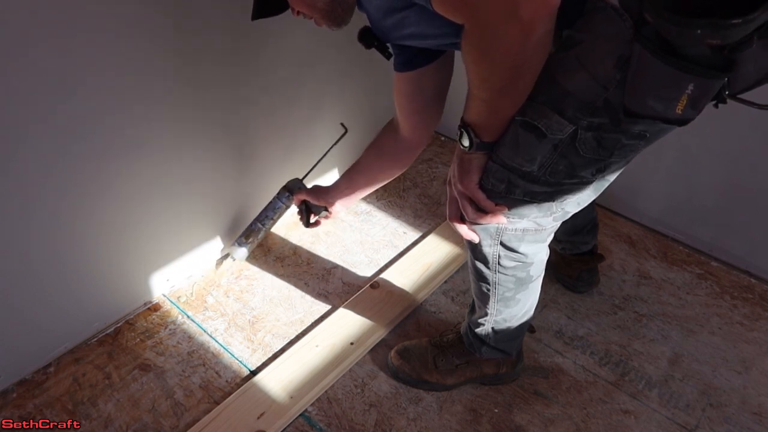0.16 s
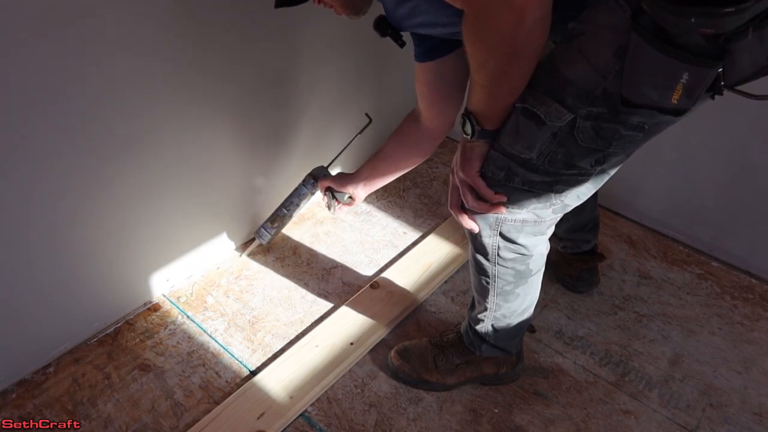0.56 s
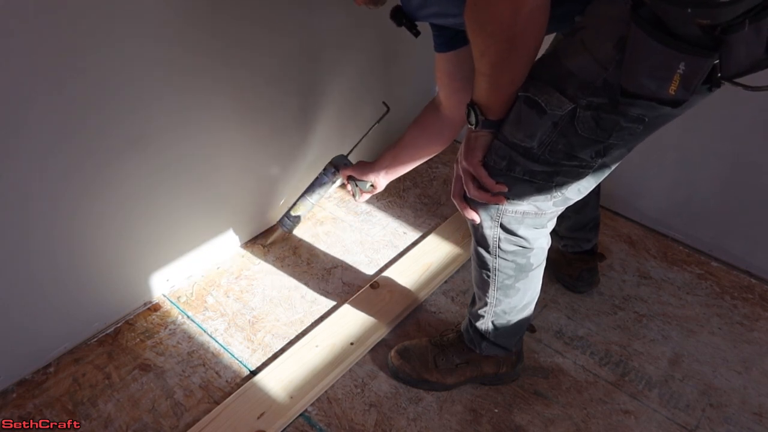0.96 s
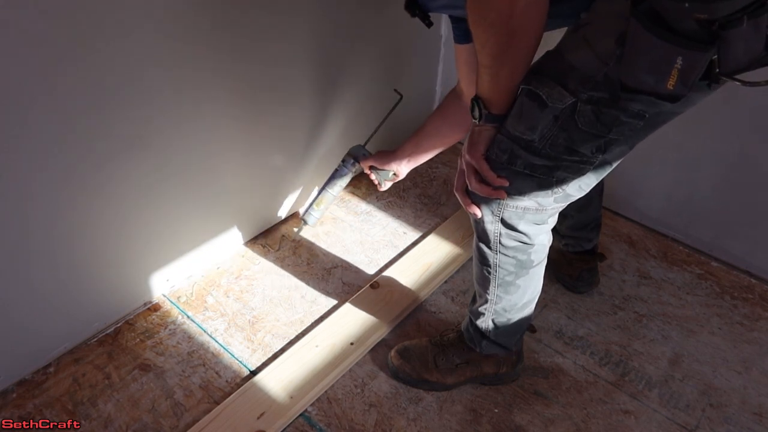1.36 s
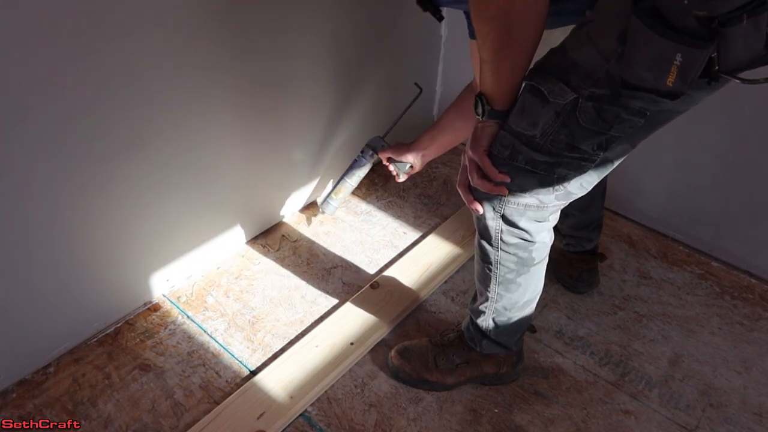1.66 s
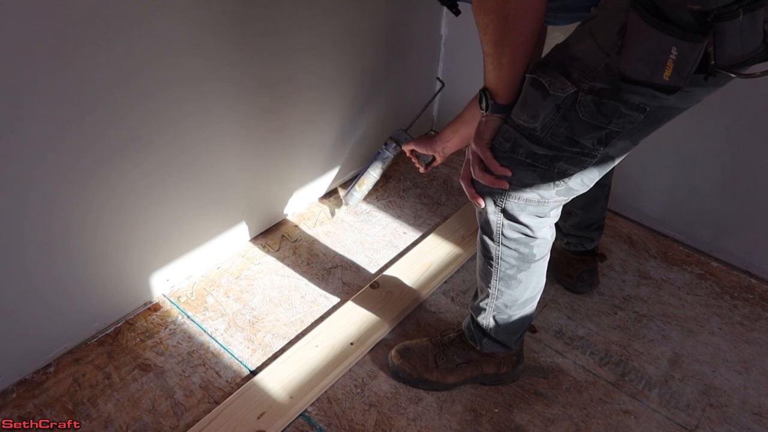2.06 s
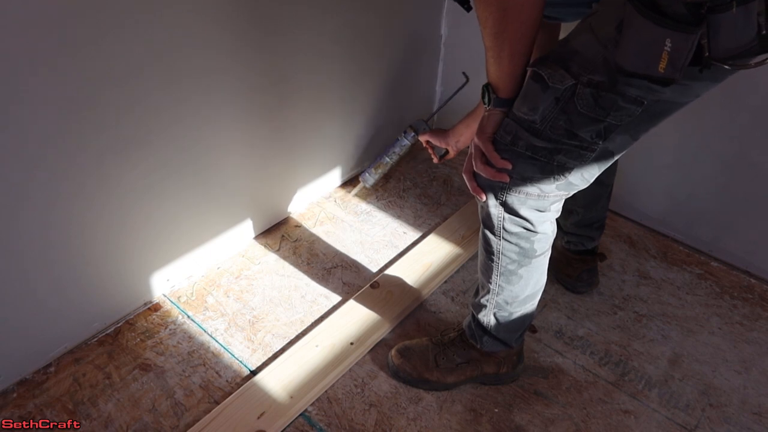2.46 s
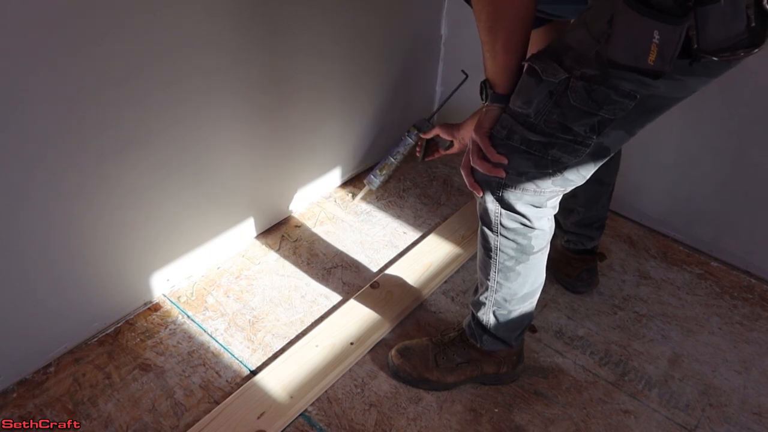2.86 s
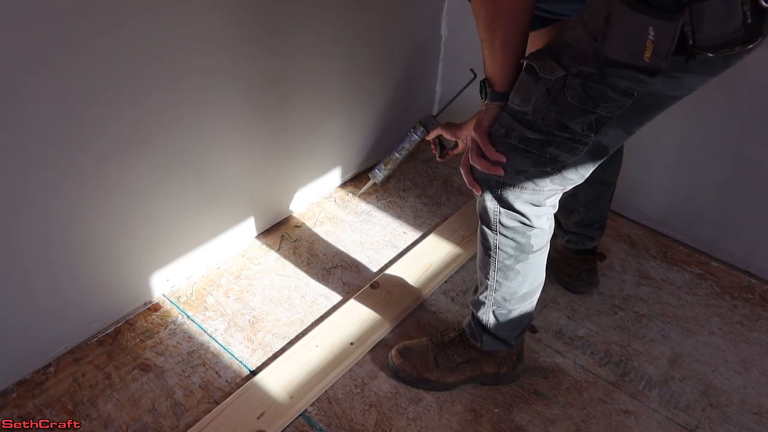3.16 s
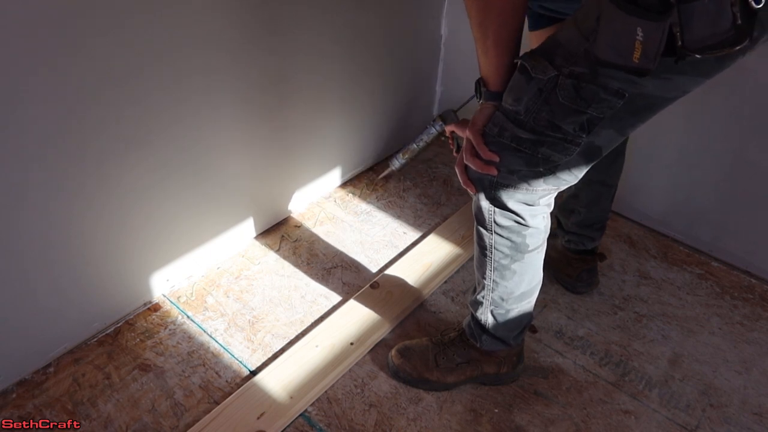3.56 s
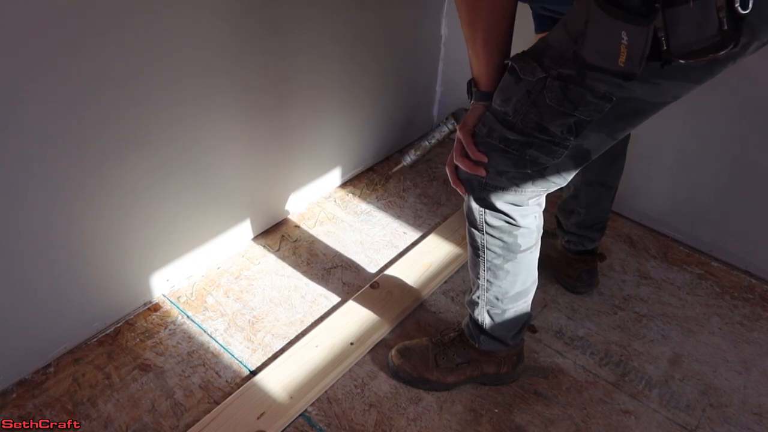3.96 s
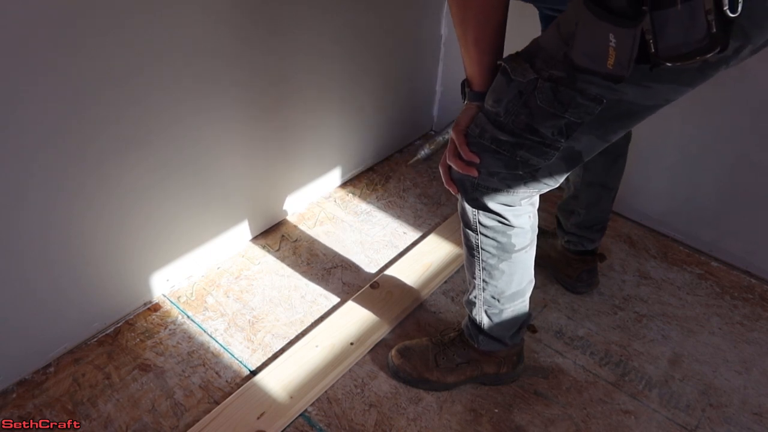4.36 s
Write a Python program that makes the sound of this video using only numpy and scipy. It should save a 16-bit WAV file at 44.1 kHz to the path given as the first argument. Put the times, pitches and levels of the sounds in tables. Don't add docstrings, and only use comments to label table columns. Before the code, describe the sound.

In a bare room with hard walls, boards bump and scuff softly in an uneven, steady beat on a hollow wooden floor. A caulking gun clicks at its release tab, then its trigger snaps loudly with a short steel ring. More wood knocks follow, then a loose plate clatters and bites, and another double trigger snap rings out. Knocks continue to the end. Near microphone, short bright room tail, faint low room noise.

```python
import sys
import numpy as np
from scipy import signal
from scipy.fft import rfft, irfft, next_fast_len
from scipy.io import wavfile
from scipy.ndimage import uniform_filter1d

SR = 44100
rng = np.random.default_rng(int(sys.argv[2]) if len(sys.argv) > 2 else 0)


def gain_from_decibels(decibels):
    exponent = np.asarray(decibels, float) / 20
    return 10 ** exponent


def unload_wav(signal):
    wavfile.write(
        sys.argv[1],
        SR,
        np.round(np.clip(np.atleast_2d(signal).T, -1, 1) * 32767).astype(np.int16),
    )


N = 199331

# start in seconds, swell in seconds, strength in dB, hardness in dB.
SHOVED = [(0.0, 0.072, -51, -4), (0.131, 0.15, -45.5, -3), (0.186, 0.006, -50, 0), (0.445, 0.055, -57, 9.5),
          (0.523, 0.11, -44.5, 3), (0.703, 0.083, -56, 0), (0.889, 0.093, -41.5, 0.5),
          (1.127, 0.0065, -61.5, -2), (1.198, 0.1, -45.5, -2.5), (1.41, 0.038, -48, -9),
          (1.53, 0.043, -57.5, 4.5), (1.56, 0.0035, -44, -4.5), (1.591, 0.012, -38.5, -1.5),
          (1.887, 0.0057, -45.5, -2), (1.89, 0.031, -42, -4), (2.039, 0.02, -49.5, -6),
          (2.2, 0.0063, -43.5, -2), (2.205, 0.059, -45.5, 1.5), (2.356, 0.038, -44, -3),
          (2.501, 0.0061, -45, -2.5), (2.51, 0.041, -47, 2), (2.75, 0.025, -50.5, 7),
          (3.004, 0.036, -63.5, 9), (3.216, 0.12, -56, 3.5), (3.35, 0.16, -47.5, -6),
          (3.57, 0.071, -42.5, -1), (3.718, 0.013, -44, -12), (3.86, 0.0074, -45, 3.5),
          (3.87, 0.045, -41, 0.5), (4.02, 0.022, -51, -8.5), (4.14, 0.021, -50.5, -2),
          (4.167, 0.0086, -43, -0.5), (4.175, 0.052, -40.5, -3.5), (4.3, 0.033, -55.5, 2),
          (4.372, 0.009, -61.5, 4), (4.44, 0.084, -45, -2.5)]


def unit(x):
    return x / np.sqrt(np.mean(x ** 2) + 1e-20)


def along(points, hz):
    f, v = np.transpose(points)
    return np.interp(np.log(hz + 1), np.log(f + 1), v)


def filtered(x, response):
    m = next_fast_len(len(x) + 8192)
    return irfft(rfft(x, m) * response(np.fft.rfftfreq(m, 1 / SR)), m)[:len(x)]


def shaped(x, spectrum):
    return filtered(x, lambda f: gain_from_decibels(along(spectrum, f)))


def body(peaks):
    def response(f):
        total = 0
        for k, (centre, width, db) in enumerate(peaks):
            damping = 1j * f * width
            total = total + (-1) ** k * gain_from_decibels(db) * damping / (centre * centre - f * f + damping)
        return total
    return response


def causal(gain):
    def response(f):
        cepstrum = irfft(np.log(np.abs(gain(f)) + 1e-6))
        cepstrum[1:len(f) - 1] *= 2
        cepstrum[len(f):] = 0
        return np.exp(rfft(cepstrum))
    return response


def ring(modes, blur):
    t = np.arange(SR // 3) / SR
    out = np.zeros(len(t))
    for hz, db, t60 in modes:
        level = gain_from_decibels(db + rng.normal(0, 1) - 60 * t / t60)
        drift = blur * np.cumsum(rng.standard_normal(len(t)))
        out += level * np.sin(2 * np.pi * hz * t + drift) * (1 - np.exp(-t / 0.013))
    return out


def room(x, delay_s, build_s):
    # frequency in Hz, t60 in seconds.
    wall_t60 = [(500, 0.7), (1300, 0.33), (3500, 0.43), (6000, 0.41), (9000, 0.28), (14000, 0.32)]
    # frequency in Hz, level in dB.
    wall_colour = [(500, 10), (2000, 4.5), (3200, 4), (4100, -2), (5000, 0.5), (9000, 1.5), (15000, -10)]
    hz, t, z = signal.stft(rng.standard_normal(SR // 3), SR, nperseg=256)
    decay_db = 60 * t / along(wall_t60, hz)[:, None]
    tail = signal.istft(z * gain_from_decibels(along(wall_colour, hz)[:, None] - decay_db), SR, nperseg=256)[1]
    tail = tail * (1 - np.exp(-np.arange(len(tail)) / SR / build_s))
    return np.pad(signal.fftconvolve(x, tail / np.linalg.norm(tail)), (round(delay_s * SR), 0))


def spread(x, response):
    puff = filtered(np.arange(2048) == 0, causal(response))
    return puff * np.linalg.norm(x) / np.linalg.norm(puff)


def add(track, s, x):
    part = track[round(s * SR):][:len(x)]
    part += x[:len(part)]


def rattle(ms, response, crack=0):
    t = np.arange(2048) / SR
    u = t / (ms / 1000)
    chatter = rng.standard_normal(2048) * (1 - np.exp(-u / 0.016))
    settling = 0.083 * np.exp(-t / 0.013)
    top = lambda f: (1j * f / (9000 + 1j * f)) ** 2
    x = filtered(chatter * (np.exp(-u ** 2.5) + settling), lambda f: response(f) * (1 - top(f)))
    x += filtered(chatter * (np.exp(-u * 1.9) + settling), lambda f: response(f) * top(f))
    x = x / np.abs(x).max()
    x += crack * np.diff(chatter, prepend=0) * np.exp(-t / 0.00021)
    return x / np.abs(x).max()


def jolts(per_s, spread_db, smooth):
    sizes = gain_from_decibels(spread_db * np.minimum(rng.exponential(size=N), 2)) * rng.standard_normal(N)
    return unit(sizes * (rng.random(N) < per_s / SR)) + smooth * rng.standard_normal(N)


def steady(x, share):
    power = np.abs(uniform_filter1d(x ** 2, 2500)) + 1e-12
    return unit(x / power ** (share / 2))


def swells(rows, levels_db, fade, hold=0):
    start, swell = np.transpose(rows)[:2, :, None]
    t = np.arange(0, N + 64, 64) / SR - start
    rise = np.clip(t / np.maximum(swell, .004), 0, 1)
    fading_s = np.maximum(t - swell * (1 + hold), 0)
    power = (rise * gain_from_decibels(levels_db[:, None] - fade * fading_s)) ** 2
    return np.interp(np.arange(N) / 64, np.arange(t.shape[1]), np.sqrt(power.sum(0)))


def still_air():
    # frequency in Hz, density in dB per Hz.
    air_spectrum = [(15, -60.5), (30, -27), (60, -11), (200, -4.5), (460, -1), (1100, -13.5), (2200, -15.5),
                    (4000, -16.5), (7000, -22.5), (9500, -30.5), (12700, -35.5), (13000, -56)]
    return gain_from_decibels(-65.5) * unit(shaped(rng.standard_normal(N), air_spectrum))


def shuffles():
    # start in seconds, swell in seconds, cavity level in dB,
    # then sheets and joists in dB against the cavity.
    landings = [(0, 0.083, -48, -1, -11.5), (0.13, 0.14, -46, -3.5, -18), (0.346, 0.1, -51, 5, -5.5),
                (0.53, 0.11, -36.5, -8.5, -18.5), (0.76, 0.016, -48, 1.5, -7),
                (0.876, 0.12, -36.5, -10, -15.5), (1.097, 0.037, -49, -3.5, -7.5),
                (1.201, 0.1, -42, -6.5, -18.5), (1.402, 0.065, -45.5, 2.5, -8),
                (1.562, 0.008, -50.5, -1, -16), (1.575, 0.059, -44, -3, -11),
                (1.885, 0.0067, -47.5, -7, -15), (1.89, 0.04, -41, -10.5, -14), (1.991, 0.1, -54, 0, -29),
                (2.198, 0.02, -53.5, 2.5, -19), (2.209, 0.063, -51, -2, -28.5),
                (2.341, 0.077, -47.5, 1, -33), (2.474, 0.11, -53.5, 4.5, -31.5),
                (2.639, 0.1, -56.5, 4.5, -4), (2.965, 0.095, -68, -5.5, -18.5), (3.207, 0.12, -56, -2, -15),
                (3.351, 0.041, -50.5, 2, -1), (3.443, 0.0096, -56, 7, 0), (3.567, 0.077, -43, -3, -6),
                (3.862, 0.012, -42, -4.5, -6), (3.87, 0.075, -42, -3, -4), (4.167, 0.0067, -41, -6.5, -3),
                (4.177, 0.047, -38, -7.5, -0.5), (4.33, 0.058, -52, -2.5, -12),
                (4.464, 0.0074, -42, -5.5, -7), (4.47, 0.056, -46.5, -8, -9)]
    # frequency in Hz, width in Hz, level in dB.
    cavity = [(459.2, 12, 6), (488, 20, -5), (531.1, 17, 3)]
    # frequency in Hz, width in Hz, level in dB.
    sheets = [(255, 18, -4), (305, 14, 5.5), (371, 44, 5), (426, 26, 3)]
    # frequency in Hz, width in Hz, level in dB.
    joists = [(120, 32, 4), (155, 32, 8), (239, 2.6, -9)]
    # frequency in Hz, width in Hz, level in dB.
    planks = [(562.8, 9.1, 5.5), (600, 7, 4.5), (646.6, 53, -8), (752.6, 32, -5.5), (776.4, 22, -3),
              (939.6, 45, -6)]
    # frequency in Hz, width in Hz, level in dB.
    first_edges = [(1002, 67, -1.5), (1267, 74, -10), (1298, 120, -3.5), (1871, 50, 1.5), (1925, 90, 2.5),
                   (2240, 120, -4.5)]
    # frequency in Hz, width in Hz, level in dB.
    later_edges = [(926, 93, -12), (1220, 70, 8), (1286, 160, 0), (2087, 90, 3), (2330, 120, 5.5),
                   (3180, 190, -3.5)]
    # time in seconds, share of the later boards from 0 to 1.
    later_share = [(0, 0.08), (1.3, 0.39), (1.6, 0.26), (2.0, 0.63), (2.6, 0.33), (3.5, 0.66), (4.5, 0.92)]
    strength_db, hard_db = np.transpose(SHOVED)[2:]
    cavity_db, sheets_db, joists_db = np.transpose(landings)[2:]
    bumps = jolts(600, spread_db=4.5, smooth=1.6)

    def rung(peaks, leak):
        low, high = peaks[0][0], peaks[-1][0]
        span = body([(np.sqrt(low * high), 1.71 * (high - low), 0)])
        return steady(filtered(bumps, lambda f: (body(peaks)(f) + leak) * span(f) ** 2), share=0.12)

    def landed(levels_db, fade):
        return swells(landings, levels_db, fade, hold=0.068)

    later = np.interp(np.arange(N) / SR, *np.transpose(later_share))
    edges = np.sqrt(1 - later) * rung(first_edges, leak=0.062)
    edges += np.sqrt(later) * rung(later_edges, leak=0.033)
    out = landed(cavity_db + 1, fade=160) * rung(cavity, leak=0.01)
    out += landed(cavity_db + sheets_db - 3.5, fade=110) * rung(sheets, leak=0.42)
    out += landed(cavity_db + joists_db - 6.5, fade=100) * rung(joists, leak=0.22)
    out += swells(SHOVED, strength_db - 2.5, fade=125) * rung(planks, leak=0.3)
    out += swells(SHOVED, strength_db + hard_db - 4.5, fade=136.5) * edges
    return out


def blows():
    # start in seconds, peak in dB, ring
    # frequency in Hz.
    knocks = [(0.058, -45, 470), (0.4605, -21.5, 640), (0.602, -52, 467), (0.77, -61, 472),
              (1.224, -60, 480), (1.455, -31.5, 392), (1.311, -35, 519), (1.564, -31, 684), (1.6, -38, 599),
              (1.612, -27, 654), (3.67, -28, 560), (1.827, -42.5, 600), (1.894, -33, 447),
              (1.908, -39, 633), (1.937, -34.5, 678), (2.07, -45.5, 638), (2.203, -39, 778),
              (2.221, -27, 635), (2.256, -33.5, 633), (2.368, -46.5, 650), (2.39, -38, 683),
              (2.512, -36, 600), (2.529, -28, 659), (2.549, -40, 674), (2.757, -32.5, 618),
              (3.23, -47, 540), (0.921, -35, 800), (2.852, -39, 700), (3.39, -37, 600), (3.449, -31, 594),
              (3.487, -25.5, 600), (3.073, -46, 300), (3.095, -44, 620), (3.606, -42, 840),
              (3.907, -27, 800), (4.211, -34, 657), (3.738, -26, 556), (3.871, -32.5, 545),
              (4.172, -32, 700), (4.395, -39, 458), (4.468, -38, 504)]
    out = np.zeros(N)
    for s, db, hz in knocks:
        add(out, s, gain_from_decibels(db - 7.0) * rattle(6.2, body([(hz, 140, 0), (1.68 * hz, 500, -9)])))
    return out


def boards():
    return filtered(shuffles() + blows(), lambda f: (1j * f / (60 + 1j * f)) ** 3 / (1 + 1j * f / 5500) ** 3)


def grit():
    # frequency in Hz, density in dB per Hz.
    coarse = [(1800, -120), (2500, 4), (4000, 2.5), (6000, -13), (7500, -120)]
    # frequency in Hz, density in dB per Hz.
    fine = [(5000, -120), (6200, 8.5), (9000, -2.5), (12500, -14), (13200, -32.5), (16000, -39)]
    strength_db, hard_db = np.transpose(SHOVED)[2:]
    grains = jolts(1100, spread_db=11.0, smooth=1.1)
    out = swells(SHOVED, strength_db + 1.1 * hard_db - 13, fade=240) * unit(shaped(grains, coarse))
    out += swells(SHOVED, strength_db + 0.64 * hard_db - 27.5, fade=270) * unit(shaped(grains, fine))
    return out


def sing(rows, blur):
    out = np.zeros(N)
    for s, db, hz, t60 in rows:
        add(out, s, ring([(hz, db, t60)], blur))
    return out


def plank_notes():
    # start in seconds, level in dB, frequency in Hz, t60 in seconds.
    plank_tones = [(0.96, -46, 752, 0.3), (0.97, -49.5, 1410, 0.51), (1.6, -41, 1220, 0.43),
                   (1.6, -46, 915, 0.25), (1.605, -55, 1930, 0.27), (2.22, -48, 1087, 0.47),
                   (3.075, -59, 1350, 0.26), (3.11, -48, 460, 0.14), (3.325, -44, 1990, 0.15),
                   (3.327, -42, 900, 0.089), (3.585, -44, 2070, 0.15), (3.636, -45.5, 2310, 0.14),
                   (3.64, -52, 378, 0.95), (3.9, -42.5, 791, 0.22), (3.9, -45.5, 378, 0.71),
                   (3.9, -40, 1206, 0.42), (4.18, -36.5, 378, 0.52), (4.18, -36.5, 789, 0.3),
                   (4.18, -51.5, 1200, 0.4), (4.19, -56, 2300, 0.24), (4.2, -56, 155, 0.6),
                   (4.47, -49.5, 378, 0.41), (4.487, -45, 1190, 0.37), (1.39, -48.5, 193.8, 0.25),
                   (1.44, -46.5, 302, 0.18), (1.465, -44.5, 438.8, 0.18), (3.07, -54.5, 255, 0.19),
                   (3.42, -47.5, 254.7, 0.43), (3.75, -47, 255, 0.32)]
    return sing(plank_tones, blur=0.1)


def contacts(rows, ms, gain_db, peaks_at):
    out = np.zeros(N)
    for s, db, hz in rows:
        colour = body(peaks_at(hz))
        tick = rattle(ms, lambda f: colour(f) / (1 + (f / 14000) ** 4))
        received = spread(tick, lambda f: colour(f) / (1 + (f / 10000) ** 4))
        add(out, s, gain_from_decibels(db + gain_db + 3.5) * tick)
        add(out, s, gain_from_decibels(db + gain_db - 5.5) * room(received, delay_s=0.0021, build_s=.008))
    return out


def scuffs():
    # start in seconds, peak in dB, strongest frequency in Hz.
    caught = [(1.5648, -45, 1910), (1.9114, -43, 2330), (2.2244, -40, 2190), (2.2568, -39.5, 2040),
              (2.369, -42.5, 2050), (2.4014, -48, 2160), (2.5257, -42, 1910), (2.5544, -40, 2030),
              (2.5744, -41, 2070), (3.6194, -48, 2210), (3.6394, -43, 2330), (3.7404, -35, 2410),
              (3.9294, -49, 2270), (3.9494, -48, 1950), (4.2294, -40, 2300), (4.2494, -50, 2030),
              (4.4792, -48, 2930)]
    return contacts(caught, 5, -12, lambda hz: [(2100, 700, -3), (hz, 900, 0), (6000, 4000, -17)])


def belt_ticks():
    # start in seconds, peak in dB, strongest frequency in Hz.
    jingles = [(0.121, -52.5, 4800), (0.325, -59, 4700), (0.355, -60, 4700), (2.258, -66, 6950),
               (2.721, -56, 4910), (3.871, -40, 5100), (4.134, -53.5, 7500), (4.2, -49, 8740),
               (4.213, -40.5, 6990), (4.3227, -59.5, 8580), (4.477, -67, 9000), (4.498, -68, 9000)]
    return contacts(jingles, 3.5, 0, lambda hz: [(3000, 2500, -8), (hz, 2500, 0.5), (12000, 4000, -13)])


def rod_ticks():
    # start in seconds, peak in dB, strongest frequency in Hz.
    touches = [(0.189, -68, 3640), (0.2462, -52, 4600), (0.259, -54, 3640), (0.6018, -59, 3900),
               (0.629, -53, 3640), (1.4262, -54, 4460), (1.544, -56.5, 3650), (1.5683, -62, 3700),
               (1.8895, -54, 3700), (1.9447, -51, 3980), (2.057, -60, 4000), (2.2086, -56.5, 4740),
               (2.262, -49.5, 3760), (2.3815, -54, 3780), (2.5098, -50.5, 3700), (2.5431, -50.5, 3840),
               (3.2053, -54.5, 2800), (3.324, -51, 3400), (3.5904, -49.5, 3600), (3.6657, -53, 3970),
               (3.7806, -60, 3700), (3.74, -61, 2670), (3.9068, -67, 3980), (4.025, -54.5, 3900),
               (4.189, -43, 2500), (4.1713, -47, 4770), (4.381, -56.5, 3360), (4.393, -57, 2600),
               (4.322, -51.5, 2460), (1.61, -61, 3650), (1.653, -62, 3440), (3.097, -57.5, 3000),
               (4.452, -61, 6240), (4.5103, -52.5, 3560)]
    return contacts(touches, 6, 0, lambda hz: [(2100, 900, -4), (hz, 1500, 0), (8500, 4000, -12)])


def drag():
    # start in seconds, swell in seconds, level in dB.
    slips = [
        (2.734, 0.033, -48),
        (2.805, 0.06, -52),
    ]
    # frequency in Hz, density in dB per Hz.
    scrape_spectrum = [(600, -120), (1200, -1.5), (2500, 3), (6000, 0), (11000, -18.5), (15500, -21),
                       (16200, -120)]
    scrape = shaped(jolts(900, spread_db=8.0, smooth=1.1), scrape_spectrum)
    return swells(slips, np.transpose(slips)[2], fade=250) * unit(scrape)


def cradle_notes():
    # start in seconds, level in dB, frequency in Hz, t60 in seconds.
    cradle_tones = [
        (0.872, -48.5, 3250, 0.3),
        (0.925, -36.5, 6086, 0.3),
        (0.925, -42, 4730, 0.5),
        (0.925, -42.5, 6930, 0.25),
        (2.856, -43.5, 5310, 0.45),
        (3.386, -36.5, 4720, 0.39),
        (3.386, -42, 5600, 0.35),
        (3.386, -44, 3100, 0.3),
        (3.386, -45.5, 2000, 0.3),
    ]
    return sing(cradle_tones, blur=0.2)


def gun_part(rows, ms, ring_db, wide_hz, room_db):
    # frequency in Hz, width in Hz, level in dB.
    frame = [(1771, 390, -9), (3850, 130, -22), (4600, 83, -14), (5750, 970, -7), (6800, 540, -7),
             (7450, 630, -5.5), (9800, 1200, -5.5), (10200, 1400, -6.5), (13300, 640, -14.5)]
    # frequency in Hz, level in dB, t60 in seconds.
    rod = [(4700, -30, 0.36), (5370, -35.5, 0.17), (6580, -23.5, 0.074), (3316, -39, 0.44)]
    # delay in seconds, level in dB.
    echoes = [(0.0182, -26.5), (0.031, -18), (.042, -20.5)]
    out = np.zeros(N)
    for s, db, hz, low_db, top_db in rows:
        tilt = [(120, low_db - 11.5), (700, low_db + 2.5), (1500, low_db + 7.5), (3500, 0.0063),
                (7500, top_db + 6.5), (11000, top_db + 6.5), (15600, top_db - 2), (16800, top_db - 18.5)]
        steel = min(1, gain_from_decibels(-low_db - 9.5))

        def colour(f, share=1):
            favoured = share * np.abs(body([(hz, wide_hz, -2)])(f))
            return gain_from_decibels(along(tilt, f)) * (steel * np.abs(body(frame)(f)) + 0.11 + favoured)

        snap = rattle(ms, causal(colour), crack=gain_from_decibels(2.2 * top_db + 2))
        received = spread(snap, lambda f: colour(f, share=0.38) ** 1.2)
        add(out, s, gain_from_decibels(db) * snap)
        add(out, s, gain_from_decibels(db + ring_db) * ring(rod, blur=0.22))
        add(out, s, gain_from_decibels(db + room_db) * room(received, delay_s=0.0048, build_s=0.011))
        for delay_s, echo_db in echoes:
            echo = filtered(snap, lambda f: 1 / (1 + 1j * f / 9000) ** 2)
            add(out, s + delay_s, gain_from_decibels(db + echo_db) * echo)
    return out


def release():
    # start in seconds, peak in dB, strongest frequency in Hz, low and top part in dB.
    releases = [
        (.4540, -49, 3000, -15, -34.5),
        (.4607, -18.5, 5350, -5.5, -22.5),
        (.4643, -32, 2380, -3, -29.5),
        (.4737, -28.5, 3477, -14, -33),
    ]
    # frequency in Hz, width in Hz, level in dB.
    tab_modes = [(8390, 910, -12), (9300, 700, -6.5)]
    out = gun_part(releases, ms=2.8, ring_db=-10, wide_hz=1600, room_db=-5)
    colour = lambda f: body(tab_modes)(f) ** 2
    tab = rattle(1.7, colour)
    add(out, .4607, gain_from_decibels(-30.5) * tab)
    add(out, .4607, gain_from_decibels(-32.0) * room(spread(tab, colour), delay_s=.002, build_s=0.009))
    return out


def plate():
    # start in seconds, peak in dB, strongest frequency in Hz, low and top part in dB.
    clatter = [(2.7540, -37.5, 2100, -9, -29.5), (2.7590, -34, 2380, -22, -23.5),
               (2.7733, -23, 2700, -13.5, -23), (2.7923, -20.5, 1540, -14, -17.5),
               (2.8005, -29, 2080, -17.5, -12.5), (2.8140, -31, 2590, 19, -5.5),
               (2.8065, -40, 3510, -13, -22.5), (2.8200, -45.5, 1600, -7, -22),
               (2.8390, -43, 3200, -7, -20), (2.8290, -38, 3000, -17, -17.5),
               (2.8325, -35.5, 5500, -26, -23.5), (2.8700, -36, 5630, -25, -21),
               (3.0210, -39.5, 3400, 1, -17.5), (3.0350, -42.5, 3700, -16, -28),
               (3.0545, -40, 3000, -11.5, -22.5)]
    return gun_part(clatter, ms=7, ring_db=-3, wide_hz=230, room_db=-9.5)


def bite():
    # start in seconds, peak in dB, strongest frequency in Hz, low and top part in dB.
    bites = [
        (2.8505, -8, 5910, -17, -8),
        (2.8575, -23.5, 3120, -12, -17.5),
    ]
    return gun_part(bites, ms=5.3, ring_db=-9.5, wide_hz=780, room_db=-10.5)


def trigger():
    # start in seconds, peak in dB, strongest frequency in Hz, low and top part in dB.
    clicks = [
        (.8688, -23, 6680, -19, -12.5),
        (.9200, -5.5, 3850, -23.5, -9.5),
        (3.3725, -16.5, 5640, -27.5, -10),
        (3.3818, -7.5, 4860, -22.5, -8),
        (3.3875, -17, 4745, -10.5, -13.5),
    ]
    return gun_part(clicks, ms=4.4, ring_db=0, wide_hz=120, room_db=-10)


def scene():
    floor = boards() + grit() + plank_notes() + scuffs()
    gun = rod_ticks() + drag() + cradle_notes() + release() + plate() + bite() + trigger()
    return (still_air() + floor + belt_ticks() + gun)[None]


def band_limit(x):
    return signal.sosfilt(signal.butter(12, 16860, fs=SR, output="sos"), x)


def record(dry):
    band = filtered(dry[0], lambda f: (f < 16440) / (1 + (28.66 / (f + 1)) ** 4))
    return band_limit(band[None])


dry = scene()
out = record(dry)
unload_wav(out)
```